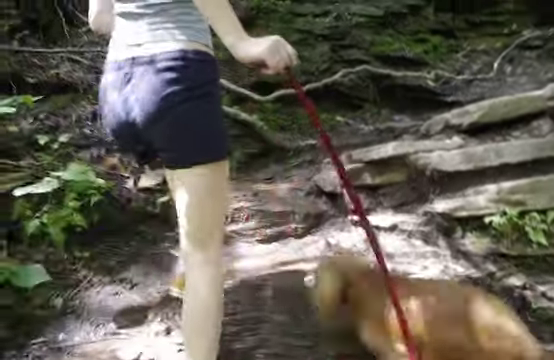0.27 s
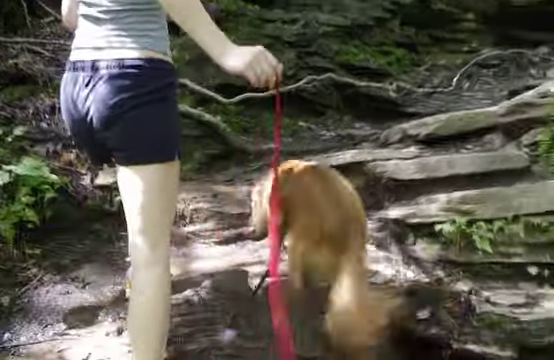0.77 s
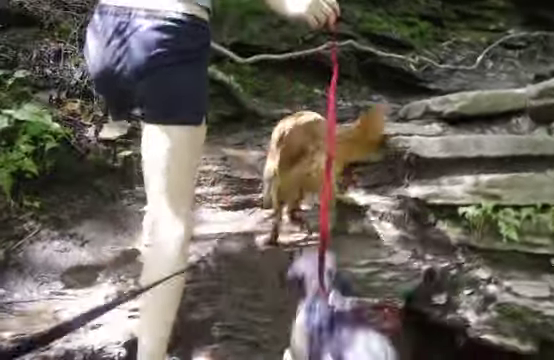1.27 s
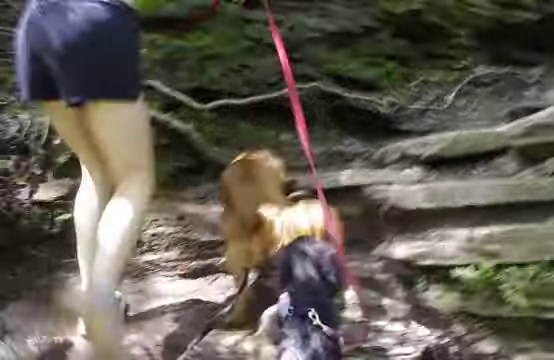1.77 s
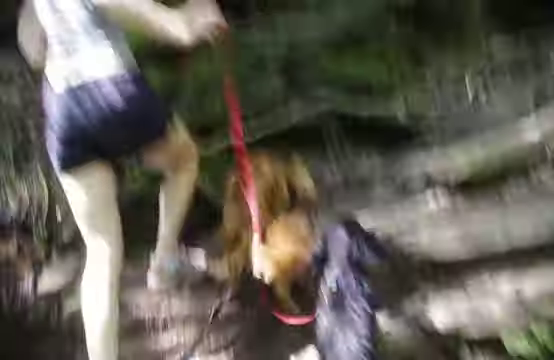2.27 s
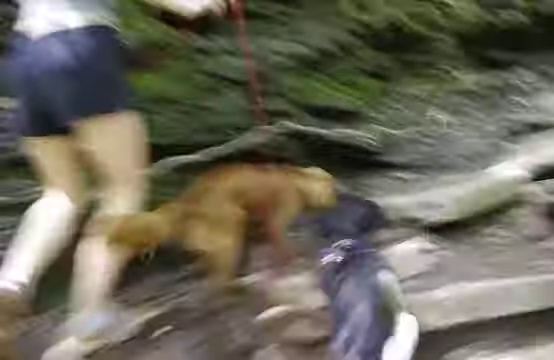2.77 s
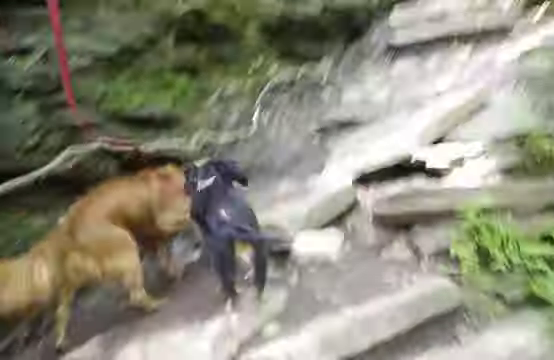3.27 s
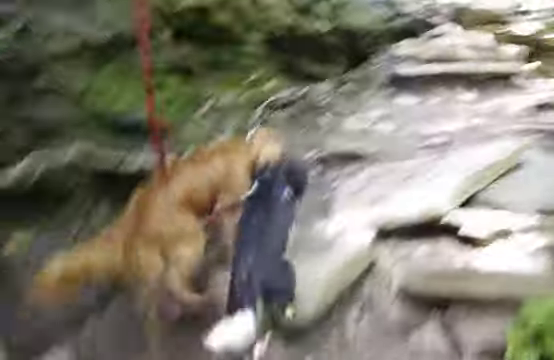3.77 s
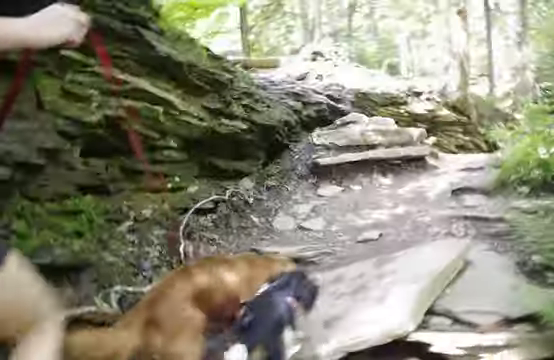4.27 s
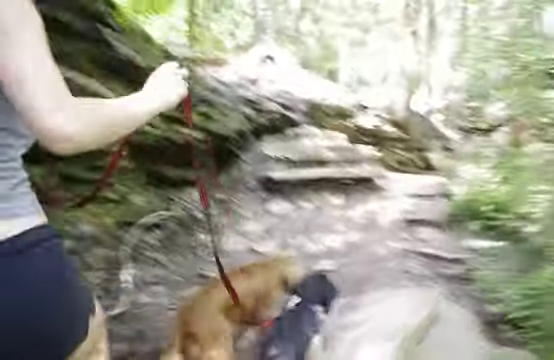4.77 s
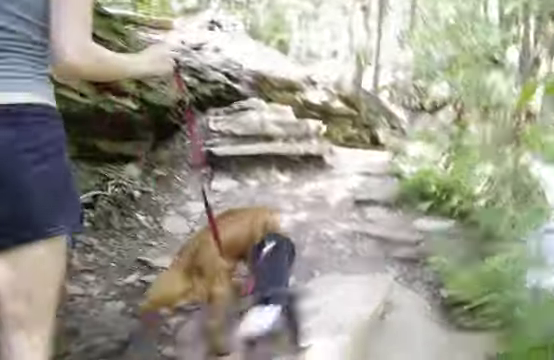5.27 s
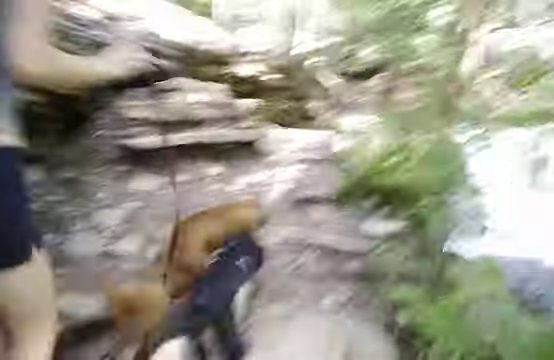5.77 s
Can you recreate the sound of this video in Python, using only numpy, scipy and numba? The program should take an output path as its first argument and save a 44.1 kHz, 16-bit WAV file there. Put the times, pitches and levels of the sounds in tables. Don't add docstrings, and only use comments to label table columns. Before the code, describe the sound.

A small waterfall hisses and splashes steadily over rock ledges close by, its low pool rumble thinning after about three seconds.

```python
import sys
import numpy as np
from scipy import signal
from scipy.fft import rfft, irfft, next_fast_len
from scipy.io import wavfile
from scipy.ndimage import uniform_filter1d
from numba import njit

SR = 44100
rng = np.random.default_rng(int(sys.argv[2]) if len(sys.argv) > 2 else 0)


def gain_from_decibels(decibels):
    exponent = np.asarray(decibels, float) / 20
    return 10 ** exponent


def transcribe(u):
    v = np.clip(np.atleast_2d(u).T, -1, 1)
    q = np.round(v * 32767).astype(np.int16)
    wavfile.write(sys.argv[1], SR, q)


N = 266018


def waterfall():
    # (time [s], share turned away from the pool [0-1])
    turn = [
        (0, 0),
        (1, 0.07),
        (2, 0.12),
        (2.75, 0.1),
        (2.95, 0.3),
        (3.1, 0.92),
        (4.6, 0.91),
        (5.2, 0.9),
        (6.03, 0.93),
    ]
    s, share = np.transpose(turn)
    away = np.clip(np.interp(np.arange(N) / SR, s, share), 0, 1)
    surge = slugs()
    patter = walk(90)
    fall = pool(away, surge, patter) + splash(away, surge, patter)
    fall = fall + spray(surge, patter) + mist(away, surge, patter)
    return gain_from_decibels(-23.5) * fall


def pool(away, surge, patter):
    # (frequency [Hz], level [dB])
    near_pool = [(18, -80), (30, -54.5), (269, -2.5), (351, -4), (600, 0), (810, -2.5), (1090, -12.5),
                 (1300, -16), (1690, -28), (2860, -120)]
    # (frequency [Hz], level [dB])
    away_pool = [(18, -83), (30, -25), (96, -25), (178, -9), (222, -4.5), (314, -1.5), (481, -0.5),
                 (810, -5.5), (1300, -11.5), (1690, -62), (2860, -120)]
    swarm = bubbles(100.7, 1277, cycles=2.27, spread_db=1.1, count=6000)
    near = part(near_pool, swarm, hiss=0.63)
    far = part(away_pool, swarm, hiss=0.63)
    level_db = between(-8.5, -12, away)
    level_db = level_db - 0.75 * np.arange(N) / SR
    return turned(near, far, away) * gain_from_decibels(level_db + 0.62 * surge + 0.17 * patter)


def splash(away, surge, patter):
    # (frequency [Hz], level [dB])
    near_splash = [(470, -27), (800, -6.5), (1100, -5.5), (1310, -4), (2180, -3), (2660, -4), (4350, -2.5),
                   (5500, -5), (7150, -32), (12100, -120)]
    # (frequency [Hz], level [dB])
    away_splash = [(470, -32), (800, -7), (1260, -4.5), (1640, -3.5), (1760, -4.5), (3360, -4), (5500, -2),
                   (7150, -33), (12100, -120)]
    swarm = bubbles(786, 5270, cycles=1.86, spread_db=1.04, count=20000)
    near = part(near_splash, swarm, hiss=0.7)
    far = part(away_splash, swarm, hiss=0.7)
    level_db = between(-5.5, -8, away)
    flicker = 0.18 * walk(7.6)
    return turned(near, far, away) * gain_from_decibels(level_db + 0.68 * surge + 0.52 * patter + flicker)


def spray(surge, patter):
    # (frequency [Hz], level [dB])
    spray_colour = [(2470, -34), (4200, -10.5), (5840, -4), (8670, 2), (9360, -1), (10500, -11),
                    (13600, -30), (22000, -120)]
    swarm = bubbles(4360, 10550, cycles=1.66, spread_db=2.3, count=40000)
    flicker = 0.12 * walk(25.34)
    return part(spray_colour, swarm, hiss=0.54) * gain_from_decibels(0.25 * surge + 0.44 * patter + flicker)


def mist(away, surge, patter):
    # (frequency [Hz], level [dB])
    mist_colour = [(5710, -25), (9700, -1), (13100, -21.5), (14900, -31)]
    swarm = bubbles(9100, 14300, cycles=1.0, spread_db=3.2, count=40000)
    level_db = between(-11.2, -8.5, away)
    flicker = 0.46 * walk(14)
    return part(mist_colour, swarm, hiss=0.85) * gain_from_decibels(level_db + 0.5 * surge + 0.3 * patter + flicker)


def slugs():
    # (time [s], swell [dB])
    swells = [(.15, 0), (.25, -0.5), (.62, -1), (.98, 1.5), (1.2, -1), (1.45, 1), (1.9, -.8), (2.15, -2.5),
              (2.35, -0.8), (2.55, 2), (2.73, 1), (2.85, -0.5), (3.2, -1.5), (3.45, -1), (3.65, 1.5),
              (3.85, 0), (4.05, -1.5), (4.25, -0.7), (4.75, -2), (4.92, 1), (5.73, -3), (5.92, 3)]
    s, db = np.transpose(swells)
    width_s = 0.031
    bells = np.exp(-.5 * ((np.arange(N) / SR - s[:, None]) / width_s) ** 2)
    return db @ bells


def bubbles(lo_hz, hi_hz, cycles, spread_db, count):
    when, pitch, long, loud = rng.random((count, 4)).T
    hz = lo_hz * (hi_hz / lo_hz) ** pitch
    size = gain_from_decibels(-spread_db * np.log(1 - .995 * loud))
    return ring((when * N).astype(np.int64), hz, cycles * (.5 + long), size, 0.07)


@njit
def ring(start, hz, cycles, size, glide):
    out = np.zeros(N)
    for k in range(len(start)):
        life = cycles[k] * SR / hz[k]
        wave = size[k] + 0j
        turn = np.exp(2j * np.pi * hz[k] / SR - 1 / life)
        bend = np.exp(2j * np.pi * hz[k] / SR * glide / life)
        for i in range(start[k], min(N, start[k] + int(4 * life))):
            out[i] += wave.imag
            wave *= turn
            turn *= bend
    return out


def part(shape, swarm, hiss):
    blur = colour(rng.standard_normal(N), shape)
    return np.sqrt(1 - hiss) * colour(swarm, shape) + np.sqrt(hiss) * blur


def turned(near, far, away):
    return np.sqrt(1 - away) * near + np.sqrt(away) * far


def between(near_db, far_db, away):
    return near_db + (far_db - near_db) * away


def colour(x, shape):
    size = next_fast_len(N)
    spec = rfft(x, size)
    broad = np.sqrt(uniform_filter1d(np.abs(spec) ** 2, size=size // 200))
    hz, db = np.transpose(shape)
    bin_hz = np.arange(len(spec)) * SR / size + 1
    gain = gain_from_decibels(np.interp(np.log(bin_hz), np.log(hz), db, left=-200, right=-200))
    return unit(irfft(spec / broad * gain, size)[:N])


def walk(rate):
    k = int(SR / rate)
    steps = np.repeat(rng.standard_normal(N // k + 1), k)
    smooth = uniform_filter1d(uniform_filter1d(steps, k), k)
    return unit(smooth[:N])


def unit(x):
    return x / np.sqrt(np.mean(x ** 2))


@njit
def lift(x, hz, width, gain):
    y, band, low = np.empty(len(x)), 0., 0.
    for i in range(len(x)):
        g = np.tan(np.pi * hz[i] / SR)
        k = width / hz[i]
        v = (band + g * (x[i] - low)) / (1 + g * (g + k))
        band = 2 * v - band
        low = low + 2 * g * v
        y[i] = x[i] + (gain[i] - 1) * k * v
    return y


def scene():
    # (middle [s], length [s], frequency [Hz], lift [dB])
    hollows = [(.35, 1.1, 2330, 2.5), (.3, 1.05, 4270, 2.5), (1.5, .4, 1650, 1), (2.75, 0.37, 1000, 3.5),
               (1.5, .6, 3520, 2.5), (1.9, .3, 2200, 4.5), (2.55, .4, 2270, 4), (2.1, .6, 4300, 2.5),
               (3.15, 0.76, 2520, 1), (3.65, 1.3, 3760, 1), (3.95, 1.1, 1260, 2.5), (4.1, 0.45, 2740, 2.5),
               (4.75, 0.44, 2500, 2), (4.85, 0.92, 1080, 3.5), (5.1, .4, 4000, -1), (5.5, .6, 1270, 4),
               (5.5, 0.37, 2970, 2)]
    sharpness, edge_s = 8.1, 0.28
    sound, t = waterfall(), np.arange(N) / SR
    for middle, length, hz, db in hollows:
        opened = np.clip(.5 + (length / 2 - np.abs(t - middle)) / edge_s, 0, 1)
        sound = lift(sound, np.full(N, 1. * hz), hz / sharpness, gain_from_decibels(db * opened))
    return np.array([sound, sound])


def gain_control(dry):
    # (time [s], gain step down [dB])
    ducks = [(0.129, 1.8), (1.355, 2.0), (1.654, 1.9), (1.872, 2.1), (2.064, 1.7), (2.562, 1.8),
             (2.694, 2.0), (2.944, 1.7), (3.003, 2.1), (3.35, 3.3), (3.414, 1.7), (3.548, 1.7),
             (3.645, 1.6), (3.921, 1.8), (4.029, 2.3), (4.577, 2.3), (5.057, 2.0), (5.394, 2.2),
             (5.474, 1.8), (5.619, 1.9), (5.922, 2.4), (6.005, 1.8)]
    trip_level, trip_depth, recover_db_per_s, make_up_db = .29, .7, 65, 0.03
    over = np.maximum(np.abs(dry[0]) / trip_level, 1)
    step_db = trip_depth * 20 * np.log10(over)
    s, db = np.transpose(ducks)
    np.add.at(step_db, (s * SR).astype(int), db)
    climb_db = recover_db_per_s * np.arange(N) / SR
    duck_db = np.maximum.accumulate(step_db + climb_db) - climb_db
    return dry * gain_from_decibels(make_up_db - np.roll(duck_db, 1))


def band_limit(x):
    return signal.sosfilt(signal.butter(12, 15100, fs=SR, output="sos"), x)


def record(dry):
    rounded = np.tanh(1.4 * gain_control(dry)) / 1.4
    rumble_filter = signal.butter(2, 60, "high", fs=SR, output="sos")
    return band_limit(signal.sosfilt(rumble_filter, rounded))


dry = scene()
out = record(dry)
transcribe(out)
```